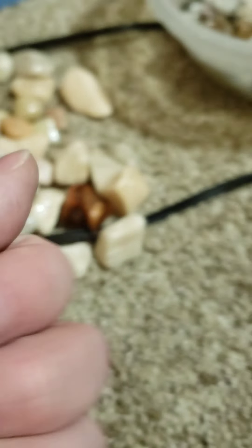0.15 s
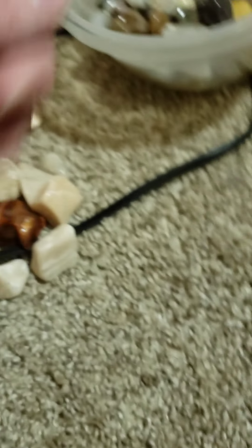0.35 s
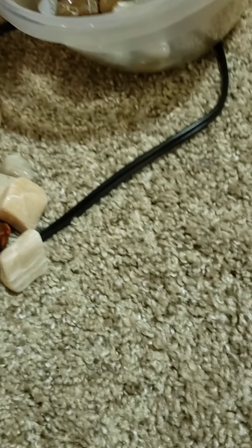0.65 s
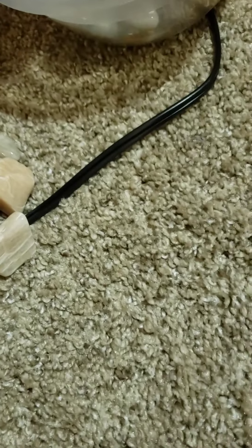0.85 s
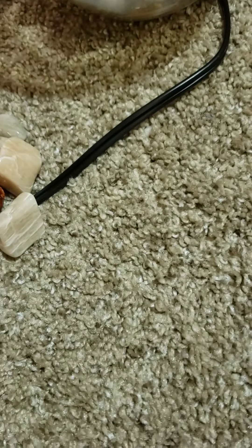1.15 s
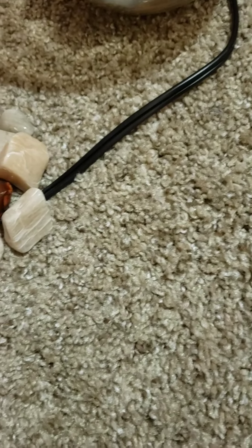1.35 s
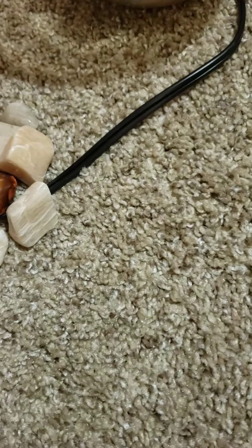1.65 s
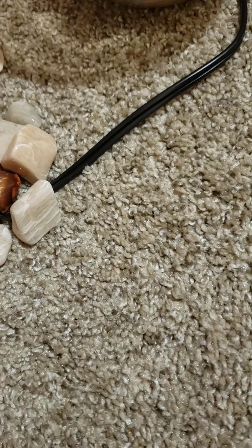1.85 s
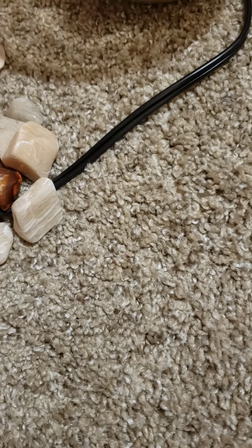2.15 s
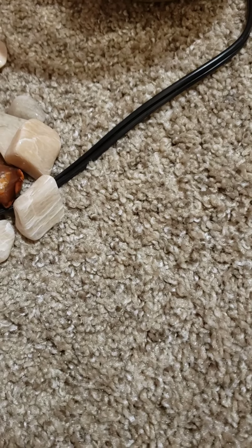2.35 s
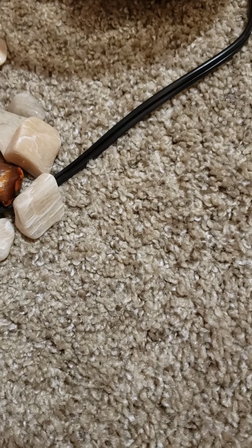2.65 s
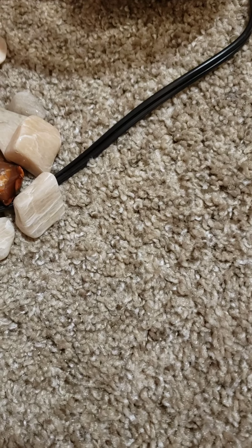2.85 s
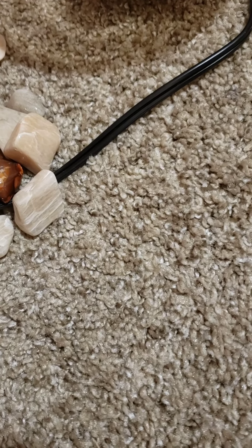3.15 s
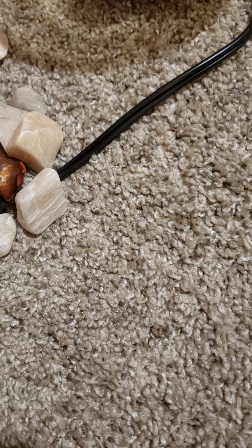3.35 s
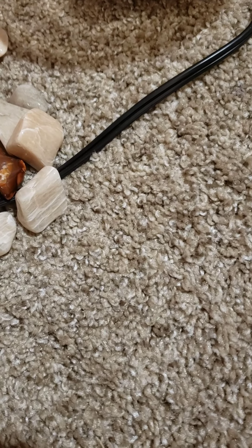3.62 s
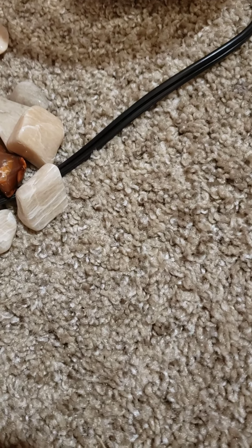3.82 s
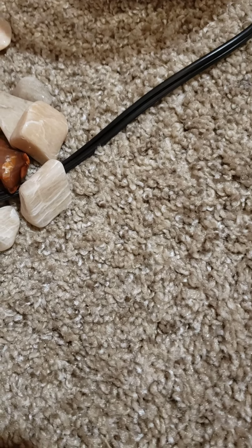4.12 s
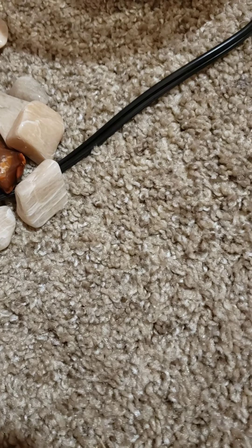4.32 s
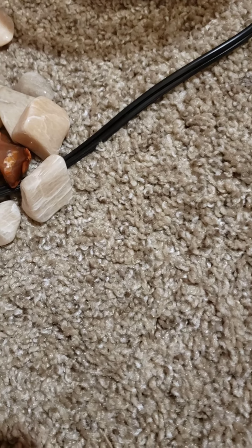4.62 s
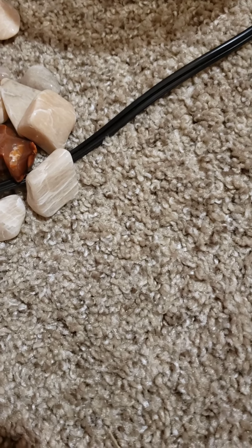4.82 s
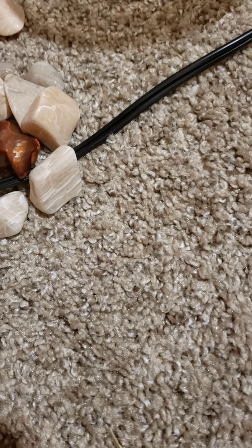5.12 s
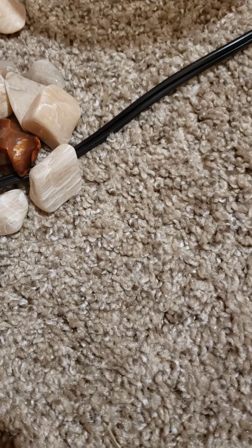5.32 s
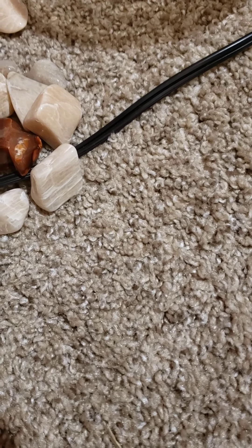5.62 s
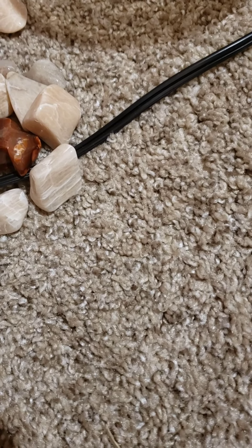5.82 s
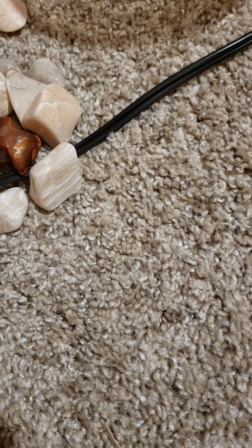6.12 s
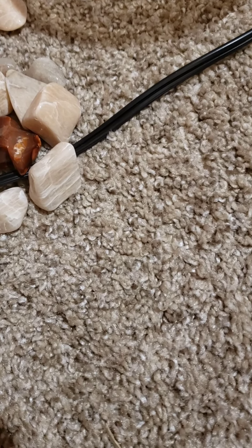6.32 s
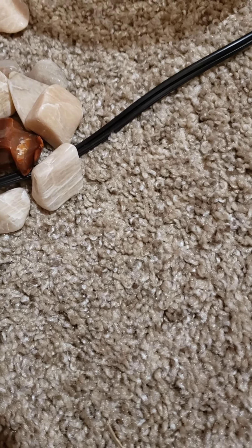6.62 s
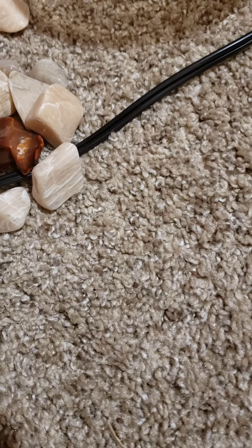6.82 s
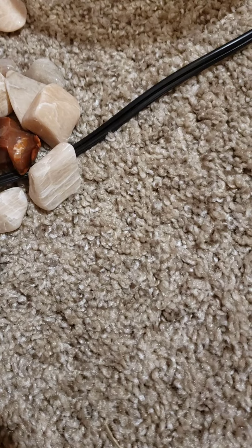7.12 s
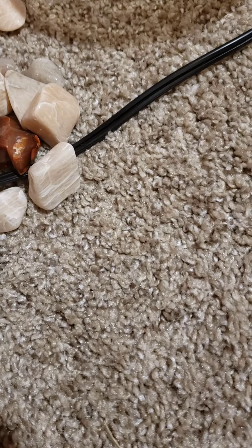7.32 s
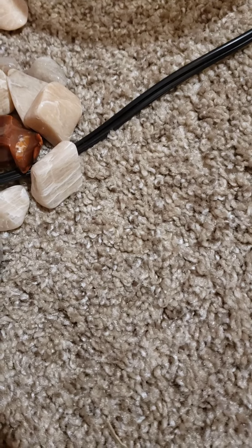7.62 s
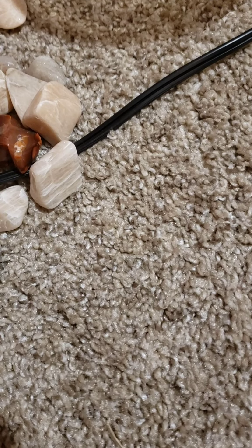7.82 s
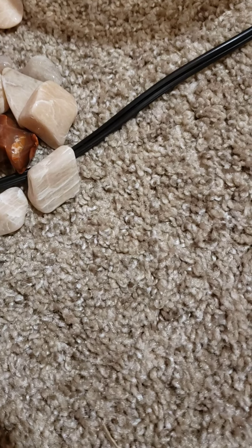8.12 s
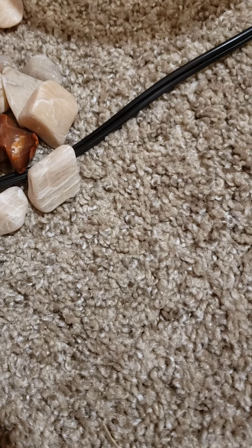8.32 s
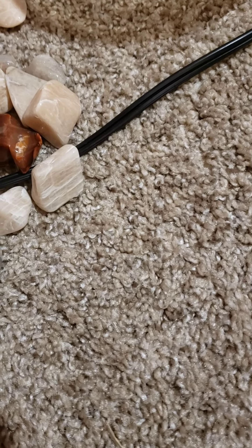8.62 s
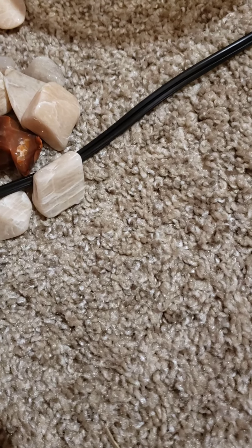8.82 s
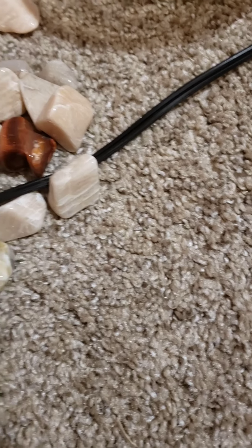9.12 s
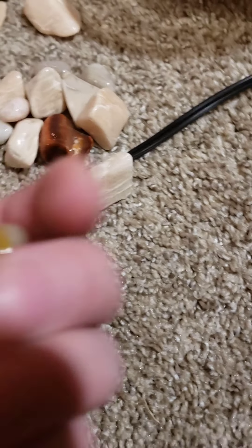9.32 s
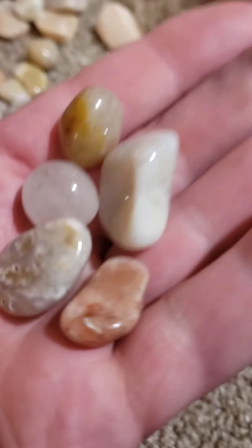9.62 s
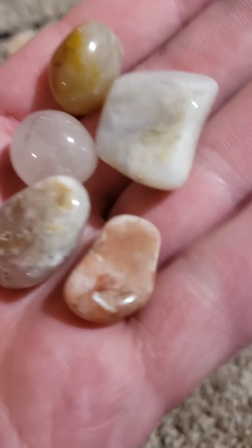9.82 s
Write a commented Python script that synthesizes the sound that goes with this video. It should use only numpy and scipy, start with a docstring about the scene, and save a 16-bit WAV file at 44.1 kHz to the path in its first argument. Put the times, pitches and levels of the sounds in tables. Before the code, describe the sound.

Hard little pebbles snap together crisply, pour in a dense, loud rattle into a resonant plastic container, and trickle to rest. One last stone lands with a hollow tock. Long sparse gaps follow, with soft hand rustles, a clack around four seconds, then scattered clusters of clicks and fine grating from near seven seconds. Dry, intimate sound in a damped room, leaning left, over a low wavering hum.

```python
"""Polished stones click in a hand, are poured into a plastic tub and settle; one more is dropped in.
Then new stones are picked from a heap on the carpet, in short bursts of clicks.
Each click is a sharp coloured pulse with a rattle; the tub rings in decaying modes, hands brush in filtered noise.
A close stereo microphone, the stones to its left, in a small damped room with a low hum.
The hardest click of the pour makes the recorder turn its gain down for about three seconds."""
import sys
import numpy as np
from scipy import signal
from scipy.fft import rfft, irfft, next_fast_len
from scipy.io import wavfile
from scipy.ndimage import uniform_filter1d, minimum_filter1d

SR = 44100
rng = np.random.default_rng(int(sys.argv[2]) if len(sys.argv) > 2 else 0)


def inscribe(sig):
    """Save sig as 16-bit PCM at rate SR to the path in sys.argv[1].

    A 1-D sig is mono; a 2-D sig holds one channel per row.
    Samples are clipped to [-1, 1] before scaling.
    """
    pcm = np.round(np.clip(np.atleast_2d(sig).T, -1, 1) * 32767)
    wavfile.write(sys.argv[1], SR, pcm.astype(np.int16))


N = 439236
TIME = np.arange(N) / SR


def amp(db):
    """Decibels to amplitude factor."""
    return 10 ** (np.asarray(db) / 20)


def unit(x):
    """Scales x to an RMS of one."""
    return x / np.sqrt(np.mean(x ** 2) + 1e-20)


def read(points, hz):
    """Reads a curve joined by straight lines over log frequency."""
    point_hz, value = np.transpose(points)
    return np.interp(np.log(hz + 1), np.log(point_hz + 1), value)


def add(mix, start_s, sound):
    """Lays a stereo sound into the mix at its start time."""
    part = mix[:, max(round(start_s * SR), 0):][:, :sound.shape[1]]
    part += sound[:, :part.shape[1]]


def colour(x, points):
    """Filters x by a spectrum in dB."""
    size = next_fast_len(N)
    gain = amp(read(points, np.fft.rfftfreq(size, 1 / SR)))
    return irfft(rfft(x, size) * gain, size)[..., :N]


def drift(hz):
    """Slow random wander: normal values of unit spread, hz of them a second, joined by lines."""
    knots = np.arange(0, N / SR + 1, 1 / hz)
    return np.interp(TIME, knots, rng.standard_normal(len(knots)))


def causal(db):
    """The sharp-fronted (minimum-phase) pulse with this spectrum, by folding its cepstrum."""
    cepstrum = irfft(np.log(amp(np.maximum(db, -70))))
    half = cepstrum.shape[-1] // 2
    cepstrum[..., 1:half] *= 2
    cepstrum[..., half + 1:] = 0
    return irfft(np.exp(rfft(cepstrum)))[..., :half]


# colour of the room's rumble and hiss at the microphone: pitch_hz [Hz], relative_level_db [dB]
RUMBLE_SPECTRUM = [(20, -25.5), (40, -10), (57, -0.5), (80, 6), (100, -1), (125, 3.5), (160, -12.5),
                   (200, -5), (250, -4.5), (290, -8.5), (400, -22), (600, -35), (2000, -71)]
HISS_SPECTRUM = [(200, -1.5), (550, -7), (730, 0.5), (1000, -5.5), (1350, -5), (2000, -8), (4000, -11.5),
                 (5800, -15.5), (6800, -13.5), (8700, -22), (12500, -8.5), (16000, -11.5)]
# how alike the two microphone sides are: pitch_hz [Hz], correlation [share]
SIDE_LIKENESS = [(50, 0.42), (400, .72), (1000, 0.012)]
# hum tones: pitch_hz [Hz], level_db [dB RMS]; both waver
HUM_TONES = [(57.5, -78), (118.6, -69.5), (242, -73)]


def floor():
    """Low rumble with a wavering hum, and faint hiss; the sides are most alike in the low mids."""
    a, b = rng.standard_normal((2, N))
    same = np.clip(read(SIDE_LIKENESS, np.fft.rfftfreq(N, 1 / SR)), -1, 1)
    right = irfft(same * rfft(a) + np.sqrt(1 - same ** 2) * rfft(b), N)
    pair = np.array([a, right])
    rumble = amp(-65.0) * unit(colour(pair, RUMBLE_SPECTRUM)) * amp(2.9 * drift(hz=10))
    rumble *= amp([[1.2], [-1.2]])  # left a little louder
    hiss = amp(-75.0) * unit(colour(pair, HISS_SPECTRUM)) * amp(0.59 * drift(hz=3.3))
    hum = np.zeros(N)
    for pitch_hz, level_db in HUM_TONES:
        level = amp(level_db + 2.7 * drift(hz=5.4)) * np.sqrt(2)
        phase = 2 * np.pi * np.cumsum(pitch_hz + 1.5 * drift(hz=8)) / SR
        hum += level * np.sin(phase)
    return rumble + hum + hiss


# how long the small room rings at each pitch: pitch_hz [Hz], t60_s [s]
ROOM_DECAY = [(200, .3), (700, 0.23), (1500, 0.26), (3500, .17), (9000, 0.12), (16000, .12)]


def room(x, wet_db=-11, right_db=-4, soak_db=3, size=16384):
    """Dense faint reflections from carpet and furniture; the top is soaked up and dies first."""
    taps = rng.standard_normal((2, size)) * (rng.random((2, size)) < .15)
    hz, t, bands = signal.stft(taps, SR, nperseg=256)
    decay_db = -60 * t / read(ROOM_DECAY, hz)[:, None]
    soaked_db = soak_db * np.clip(hz / 6000 - 1, 0, 1)[:, None]
    tail = signal.istft(bands * amp(decay_db - soaked_db), SR, nperseg=256)[1]
    # the reflections fade in between 0.5 and 1.5 ms
    tail *= np.clip(np.arange(tail.shape[1]) / SR / 0.001 - .5, 0, 1)
    tail /= np.linalg.norm(tail, axis=1, keepdims=True)
    wet = signal.oaconvolve(x.sum(0)[None], tail, axes=1)[:, :N]
    return amp(wet_db) * amp([[0], [right_db]]) * wet


# skin and carpet brushing, one swell a stroke: middle_s [s], half_length_s [s], level_db [dB]
HAND_STROKES = [(0.167, 0.054, -69.5), (0.296, 0.064, -60), (0.396, 0.025, -64.5), (4.615, 0.1, -66),
                (5.729, .11, -73.5), (6.42, .09, -75), (6.724, 0.016, -83), (6.914, 0.16, -66.5),
                (7.73, .07, -70), (8.598, 0.12, -71)]
# colour of the brushing: pitch_hz [Hz], relative_level_db [dB]
BRUSH_SPECTRUM = [(300, -8), (900, -13), (1700, -5), (3000, -5), (4400, -2.5), (5500, -4), (6700, 0.5),
                  (8700, -6), (12500, 1.5), (16000, -6)]


def rubs():
    """The soft hiss of a hand moving: flickering coloured noise under rounded swells."""
    hiss = unit(colour(rng.standard_normal((2, N)), BRUSH_SPECTRUM)) * amp(1.4 * drift(hz=88.5))
    motion = sum(amp(level_db) * np.exp(-((TIME - middle_s) / half_s) ** 2)
                 for middle_s, half_s, level_db in HAND_STROKES)
    return amp([[1], [-1]]) * hiss * motion


# the tub or the fingers bump the carpet: start_s [s], relative_level_db [dB]
CARPET_BUMPS = [(.748, -47.5), (1.005, -48), (1.07, -49.5), (5.651, -61.5), (6.418, -59.5), (7.918, -60),
                (7.94, -58.5), (7.98, -58.5), (8.147, -58), (8.215, -56.5), (8.745, -56.5), (9.311, -63)]
# colour of the bumps: pitch_hz [Hz], relative_level_db [dB]
BUMP_SPECTRUM = [(40, -5.5), (90, -7), (250, 1), (450, -7.5), (700, -14), (1400, -17.5), (2500, -18.5),
                 (6000, -36.5)]


def thuds(size=5000):
    """Soft, ringless pushes: short bursts of coloured noise, partly shared by the two sides."""
    out, t = np.zeros((2, N)), np.arange(size) / SR
    envelope = (1 - np.exp(-t / 0.0029)) * np.exp(-t / 0.019)
    for start_s, relative_db in CARPET_BUMPS:
        push = rng.standard_normal(size) + 1.105 * rng.standard_normal((2, size))
        add(out, start_s, amp(relative_db + 16.5) * push * envelope)
    return colour(out, BUMP_SPECTRUM)


# a stone strikes the tub: start_s [s], relative_level_db [dB]
TUB_BLOWS = [(.747, -38.5), (.76, -34), (.832, -35.5), (.928, -35.5), (1.001, -36.5), (1.014, -34.5),
             (1.071, -30.5), (1.087, -31.5), (1.2, -31), (1.245, -28), (1.281, -30), (1.411, -41),
             (1.737, -50), (2.1205, -23.5), (2.1355, -34)]
# the plastic tub's modes: pitch_hz [Hz], relative_level_db [dB], t60_s [s]
TUB_MODES = [(526, -13, 0.068), (603, -9.5, .07), (669, -1.5, .033), (737, -4.5, 0.065), (953, -6.5, .025),
             (1262, -11, .05), (1362, -9.5, .035), (1760, -10.5, 0.025), (2420, .5, .014),
             (3051, -9, 0.0099), (4160, 3.5, .008)]


def tub(size=6000):
    """Each blow rings the tub's decaying modes, in a mix that depends on where it lands."""
    out, t = np.zeros((2, N)), np.arange(size) / SR
    pitch_hz, mode_db, t60_s = np.transpose(TUB_MODES)[:, :, None]
    sign = (-1) ** np.arange(len(TUB_MODES))[:, None]  # neighbouring modes start in opposite directions
    for start_s, blow_db in TUB_BLOWS:
        # the place shifts each mode's level (dB) and phase (radians) on each side
        place = rng.standard_normal((2, len(TUB_MODES), 1))
        level = amp(mode_db + place - 60 * t / t60_s)
        ring = (level * np.sin(2 * np.pi * pitch_hz * t + place) * sign).sum(1)
        add(out, start_s, amp(blow_db - 6.0) * ring)
    return out * amp([[1], [-1]])


# colour of a stone close to the microphone: pitch_hz [Hz], relative_level_db [dB]
STONE_SPECTRUM = [(1000, -3.5), (2300, 0.5), (3100, -3), (4300, 1), (5500, 3), (6700, 6.5), (8700, 0.5),
                  (12500, 6), (15500, -3), (17000, -12.5)]
# colour of the right side against the left: pitch_hz [Hz], relative_level_db [dB]
RIGHT_SPECTRUM = [(1000, 6.5), (4000, 2), (6700, -5), (9000, -5), (12500, -0.5), (16000, -1.5)]


def contact(low_hz, slope_db, pan_db, ripple_db=2.5, size=1024):
    """One stereo click: a small stone radiates no bass, a soft contact no treble; hand and neighbours ripple it."""
    hz = np.fft.rfftfreq(size, 1 / SR) + 1
    db = read(STONE_SPECTRUM, hz) - 10 * np.log10(1 + (low_hz / hz) ** 8)
    db = db + slope_db * np.log2(1 + (hz / 6000) ** 2) / 2  # dB per octave well above 6 kHz
    chance = rng.standard_normal((2, len(hz)))
    ripple = np.array([unit(uniform_filter1d(side, size=17)) for side in chance])
    right_db = np.outer([0, 1], read(RIGHT_SPECTRUM, hz))
    pulse = causal(db + ripple_db * ripple + right_db)
    # fingers and stones close by scatter the pulse, dying with a 0.7 ms time constant
    scatter = .27 * rng.standard_normal((2, 128)) * np.exp(-np.arange(128) / SR / .0007)
    scatter[:, 0] = 1
    pulse = signal.fftconvolve(pulse, scatter, axes=1)
    pulse[1] = np.roll(pulse[1], rng.integers(4, 18))  # reaches the right side later, in samples
    pulse *= amp([[pan_db / 2], [-pan_db / 2]]) / np.linalg.norm(pulse, axis=1, keepdims=True)
    return pulse / np.linalg.norm(pulse)


def crowd(per_s, spread_db, low_hz, slope_db, pan_db, count=24):
    """Many stones of different size touching at random, a few of them hard."""
    out = np.zeros((2, N))
    for _ in range(count):
        touches = rng.random(N) < per_s / count / SR
        hits = touches * amp(spread_db * np.minimum(rng.exponential(1, N), 3))
        stone_low_hz = low_hz * np.exp(0.4 * rng.standard_normal())
        stone = contact(stone_low_hz, slope_db + rng.standard_normal(), pan_db)
        out += signal.oaconvolve(hits[None], stone, axes=1)[:, :N]
    return unit(out)


# stones slide over each other: start_s [s], length_s [s], relative_level_db [dB]
STONE_SLIDES = [(1.383, 0.02, -41.5), (1.459, 0.034, -38.5), (1.557, 0.22, -37.5), (1.95, 0.12, -52.5),
                (3.849, 0.42, -60.5), (4.203, 0.013, -47), (4.235, .11, -68), (8.194, 0.082, -47.5),
                (8.707, 0.1, -50), (9.167, 0.28, -58), (9.272, 0.04, -49.5)]
SLIDE_ATTACK_S, SLIDE_RELEASE_S = 0.009, 0.028


def slides():
    """Fine grating as stones shift in the heap: each slide starts quickly, holds and dies away."""
    grit = crowd(per_s=1500, spread_db=4, low_hz=2800, slope_db=-4, pan_db=7)
    motion = np.zeros(N)
    for start_s, length_s, relative_db in STONE_SLIDES:
        attack = np.clip((TIME - start_s) / SLIDE_ATTACK_S, 0, 1)
        release = np.exp(-np.maximum(TIME - start_s - length_s, 0) / SLIDE_RELEASE_S)
        motion += amp(relative_db) * attack * release
    return amp(-5.0) * grit * motion


# colour of the tub wall and heap shaking: pitch_hz [Hz], relative_level_db [dB]
SHAKE_SPECTRUM = [(60, -23.5), (130, -12), (220, -0.5), (400, 5), (520, 0.5), (700, 9), (1080, -8.5),
                  (1350, -7), (1600, 2.5), (2100, -5.5), (3000, -10), (6000, -29.5)]
# the stream of stones starts, swells as the hand tips, and runs out
POUR_START_S, POUR_PEAK_S, POUR_ATTACK_S, POUR_FADE_S = 0.7985, 1.2, 0.027, 0.097
POUR_SWELL_DB_PER_S, CLATTER_DB, SHAKE_DB = 26.5, -26.5, -41.5


def pour():
    """The handful runs into the tub, whose wall and heap shake under it; one flow drives both."""
    before = np.maximum(POUR_PEAK_S - TIME, 0)
    after = np.maximum(TIME - POUR_PEAK_S, 0)
    attack = np.clip((TIME - POUR_START_S) / POUR_ATTACK_S, 0, 1)
    flow = attack * amp(-POUR_SWELL_DB_PER_S * before) * np.exp(-(after / POUR_FADE_S) ** 2)
    clatter = crowd(per_s=1000, spread_db=3.5, low_hz=1700, slope_db=-1.5, pan_db=9.0)
    blows = rng.standard_normal(N) * (rng.random(N) < 450 / SR)  # 450 a second
    shake = unit(colour(blows * (1.1 + rng.standard_normal((2, N))), SHAKE_SPECTRUM))
    return flow * (amp(CLATTER_DB) * clatter + amp(SHAKE_DB) * amp([[1], [-1]]) * shake)


# stone meets stone: start_s [s], relative_level_db [dB], hardness as treble slope_db [dB per octave],
# relative rattle_db after it [dB]
STONE_CLICKS = [(0.0278, -18.5, 11, -3.5), (0.0401, -21.5, 9.5, -2), (.05, -12.5, 18, -22),
                (0.0841, -14.5, -2.5, -6.5), (0.4152, -21.5, 7, -30), (.45, -15.5, 12.5, 5.5),
                (0.4644, -16.5, -1.5, -7), (0.4951, -17, 6.5, -24), (0.5692, -29, 16, 4),
                (0.5784, -17.5, 13.5, 0), (0.6566, -25, 12, 1.5), (.6909, -30, 12, -9), (0.748, -17, 8, 2),
                (0.7627, -20.5, -5, -3.5), (0.8309, -9, 18.5, -4.5), (0.85, -14, 5, 0.5),
                (.873, -13.5, 15, 1), (0.9278, -10.5, 6, 2.5), (0.9718, -15, 11, 1), (1, -11.5, 4, -5),
                (1.0135, -16.5, 6, 7.5), (1.0415, -14.5, 9, 4.5), (1.0627, -16.5, 1, 3.5),
                (1.069, -13.5, 21, 5), (1.086, -16, 7.5, 3.5), (1.1066, 3, 19.5, -4),
                (1.1413, -7.5, 3.5, .5), (1.161, -4.5, 11, -8), (1.1806, -5.5, 18, -1),
                (1.2183, -5, 21, -15), (1.2956, -8.5, 6.5, -20), (1.34, -18, 4, 4.5),
                (1.3858, -26.5, 2, -8), (1.4939, -19, 7, -11), (1.5335, -19, 8, -4), (1.543, -14, 23, 3),
                (1.614, -21, 12, -6), (1.6585, -23.5, 6, -1), (1.722, -16.5, 3.5, -10),
                (1.7585, -25.5, -9.5, 0.5), (1.8518, -26.5, -4.5, -21), (1.884, -36, -4, -4),
                (1.9837, -21, 12, -6.5), (2.01, -33.5, 7, -2), (2.034, -35, -3, 2), (2.1231, -19.5, -7, -5),
                (2.1386, -27, -33, -1), (2.211, -37, -1, -0.5), (2.308, -46.5, -1.5, -12),
                (2.4281, -33.5, -1, -8), (2.476, -37, -6, -3), (2.498, -40.5, -3, -2),
                (2.597, -41.5, -16, 2.5), (2.612, -38, -12, 6), (2.818, -43.5, 13, 3.5),
                (2.9185, -39.5, 1.5, 5.5), (3.4422, -42, 10, -9.5), (3.609, -28, 6.5, 1),
                (3.8754, -34.5, 2, 5), (3.9015, -35.5, -14, -0.5), (3.9257, -30.5, -20, -9),
                (4, -30, 7.5, 4), (4.017, -31.5, 6, 5), (4.1108, -38, -12, -18), (4.1676, -15, -1, -29),
                (4.178, -24, 2, 4.5), (4.2033, -30.5, -10, 6.5), (4.311, -33.5, 5, 5),
                (5.596, -44.5, 11, -7), (6.7411, -14.5, 15, -3.5), (6.7559, -28, 5, 5.5),
                (6.8272, -39, -11, -3), (6.836, -30.5, -1, -7), (6.9828, -37, 4, -3),
                (7.0672, -41, -25, -1), (7.0799, -45, -19, 9), (7.536, -37.5, 2, 0),
                (7.5547, -20.5, -7, 0.5), (7.599, -19, 0.5, 5), (7.619, -27, 4, 3.5),
                (7.689, -37.5, 0.5, -9), (7.752, -37, -4.5, -3), (7.918, -26, -3, -9),
                (7.928, -34, 11, -1.5), (7.938, -32, -7, 1), (7.967, -24, 5.5, -5), (7.978, -32, -2, -4),
                (7.9986, -16.5, 12, -11), (8.1271, -26.5, -14, -10), (8.143, -26.5, -12, -6),
                (8.1554, -25, -16, -5), (8.1659, -18, -1, -9), (8.2058, -22, -11, -17),
                (8.2165, -21.5, -12, -5), (8.2249, -22, -16, -14), (8.511, -33.5, 6, -8),
                (8.521, -33.5, 2, 3.5), (8.7001, -41.5, -16, -15), (8.7388, -33.5, -6, -3),
                (8.7478, -24, -4.5, -7.5), (8.7758, -36, 1.5, 10), (9.061, -53, -18, -1),
                (9.1307, -16.5, -16, -7), (9.2138, -19.5, -7.5, -3.5), (9.2701, -27, 9, 1),
                (9.3072, -21.5, -2, 1), (9.324, -30, -3, -10), (9.3352, -17, -2.5, -13),
                (9.3456, -30, -4, 4), (9.354, -31, 0, 5.5), (9.4766, -26.5, 2, -6),
                (9.4945, -26.5, 6, -1.5), (9.5116, -30, -2.5, -3.5), (9.579, -48.5, 0, -5),
                (9.649, -53, -10.5, -8.5)]
# each burst of handling has its own stones and place: start_s [s],
# lowest radiated low_hz [Hz] (small stones = high), left over right pan_db [dB]
HANDLING_BURSTS = [(0, 3060, 12.3), (.35, 2380, 11.2), (.72, 1270, 15), (1.43, 2300, 8), (1.92, 3200, 9),
                   (2.07, 1405, 17), (2.3, 3760, 8.3), (4.06, 5430, 8.7), (6.6, 4400, 1), (6.93, 3200, 4.4),
                   (7.4, 3730, 4.8), (7.85, 2340, 4.5), (8.07, 4520, 5.2), (8.62, 3000, 6),
                   (9.02, 3600, 2.9), (9.245, 2900, 4.1), (9.42, 4200, 5)]


def clicks(rattle_gain_db=-1.0, rattle_s=.012, grate_per_s=2500, rebound_s=.0055, count=5, size=2200):
    """Each contact is followed by a few quick rebounds and a dying grate of surfaces."""
    out, t = np.zeros((2, N)), np.arange(size) / SR
    for start_s, relative_db, slope_db, rattle_db in STONE_CLICKS:
        burst = sum(start_s >= later[0] for later in HANDLING_BURSTS[1:])
        _, low_hz, pan_db = HANDLING_BURSTS[burst]
        grate = rng.standard_normal(size) * (rng.random(size) < grate_per_s / SR) * (t > .001)
        rebound_times = np.cumsum(rebound_s * rng.uniform(.5, 1.5, count))
        rebounds = np.zeros(size)
        rebounds[np.minimum(rebound_times * SR, size - 1).astype(int)] = rng.uniform(.5, 1, count)
        rattle = (rebounds + 0.26 * grate) * np.exp(-t / rattle_s)
        rattle *= amp(rattle_db + rattle_gain_db) / np.linalg.norm(rattle)
        strength = amp(relative_db) * np.sqrt(SR / 1000)  # pulse energy counted over 1 ms
        add(out, start_s, strength * contact(low_hz, slope_db, pan_db))
        answer = contact(low_hz, slope_db, pan_db - 0.5)
        add(out, start_s, strength * signal.fftconvolve(answer, rattle[None], axes=1))
    return out


# the recorder's gain falls at once above the limit, waits, and creeps back
LIMIT_DB, HOLD_S, RECOVER_DB_PER_S = -6.5, 2.05, 7.5
EDGE_HZ = 16150  # the recorder's upper band limit


def gain_control(x, size=88):
    """Turns the gain down by the excess of the loudest moment, holds it there, then recovers."""
    power_db = 10 * np.log10(abs(uniform_filter1d((x ** 2).sum(0), size)) + 1e-12)
    half = int(HOLD_S * SR / 2)
    headroom_db = np.minimum(LIMIT_DB - power_db, 0)
    # the origin turns the window to the past: each excess is held after it happens
    held_db = -minimum_filter1d(headroom_db, 2 * half + 1, origin=half, mode="constant")
    recovery = RECOVER_DB_PER_S * TIME
    cut_db = np.maximum.accumulate(held_db + recovery) - recovery
    return x / amp(uniform_filter1d(cut_db, size // 2))


def scene():
    """Stones and tub in the room, with the hand's rustle and the floor."""
    stones = clicks() + pour() + slides()
    knocks = tub() + thuds()
    stones_room = room(stones, wet_db=-11, right_db=-6)
    knocks_room = room(knocks, wet_db=-7.5, right_db=-1)
    return stones + stones_room + knocks + knocks_room + rubs() + floor()


def record(dry):
    """Gain control; the hardest clicks are rounded off near full scale; then the band limit."""
    rounded = .8 * np.tanh(gain_control(dry) / .8)
    band = signal.firwin(255, EDGE_HZ, window=("kaiser", 8), fs=SR)
    return signal.oaconvolve(rounded, band[None], "same")


dry = scene()
out = record(dry)
inscribe(out)
```